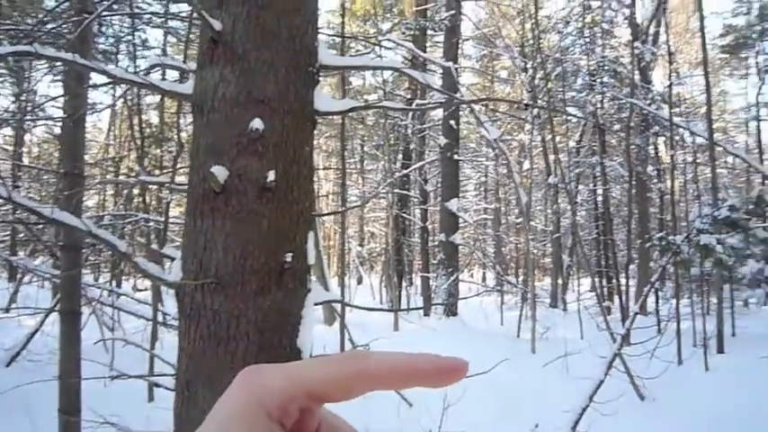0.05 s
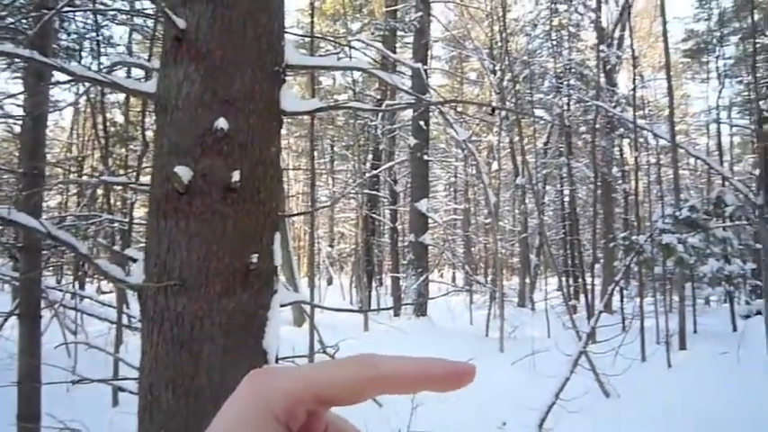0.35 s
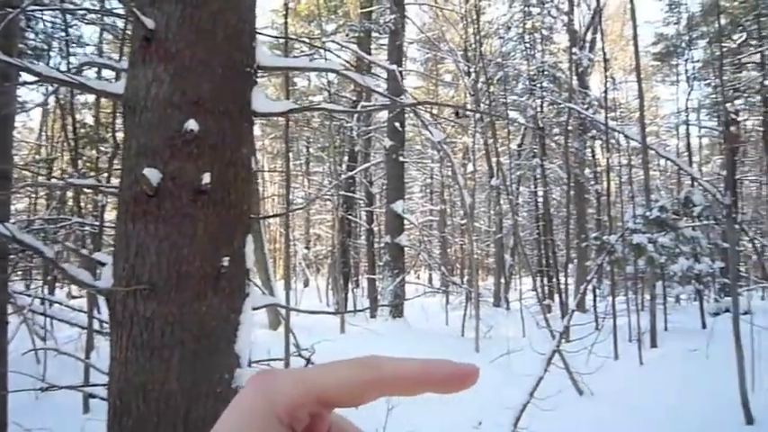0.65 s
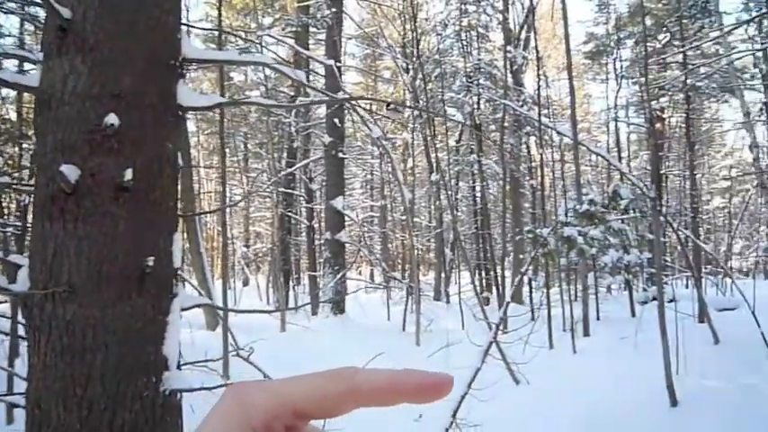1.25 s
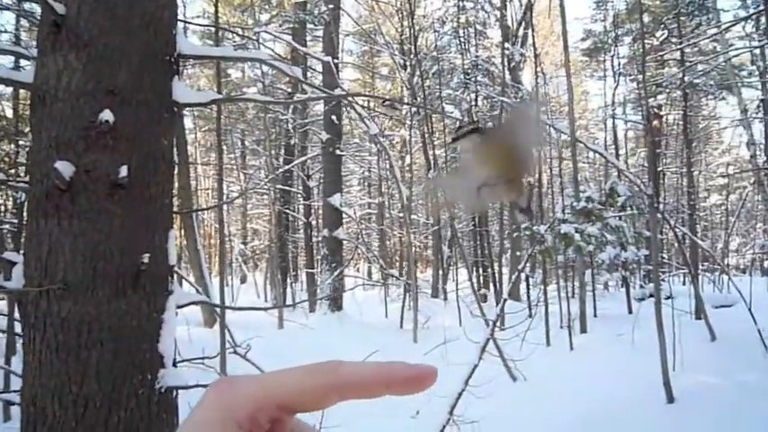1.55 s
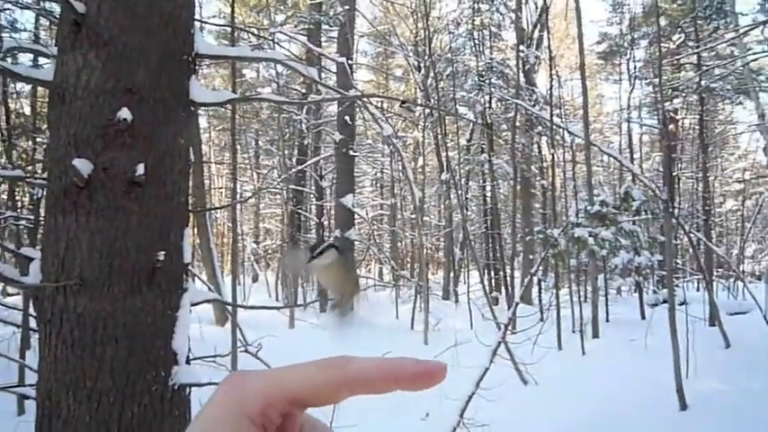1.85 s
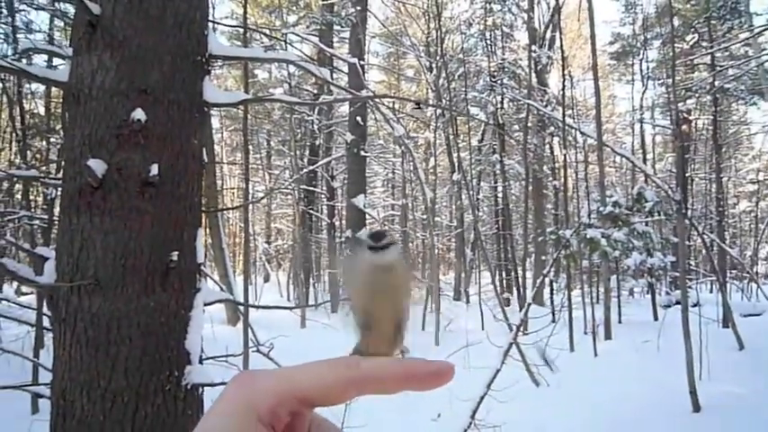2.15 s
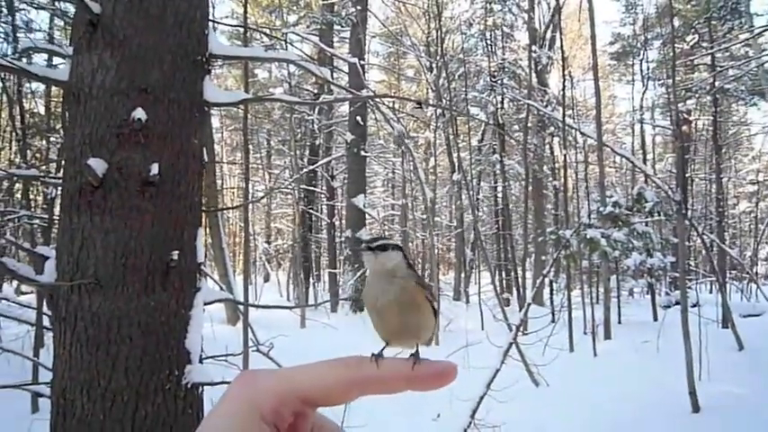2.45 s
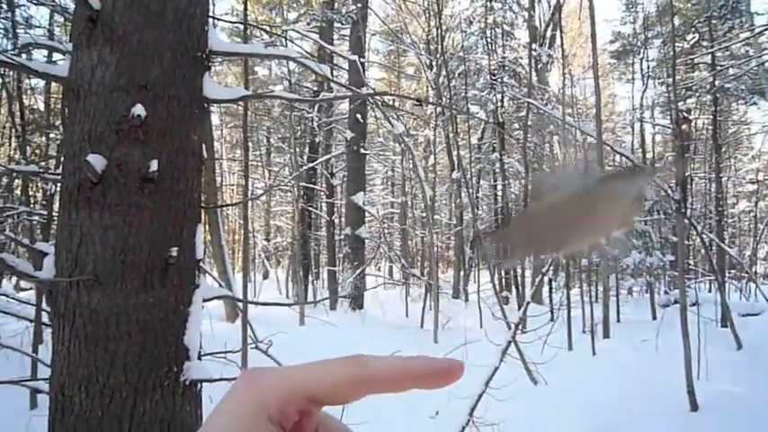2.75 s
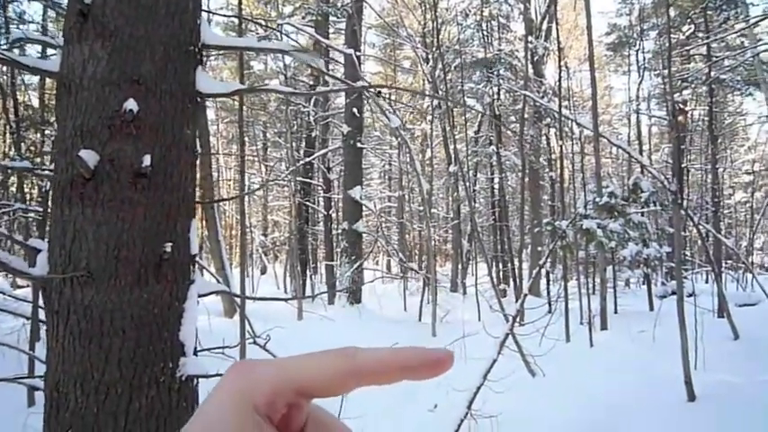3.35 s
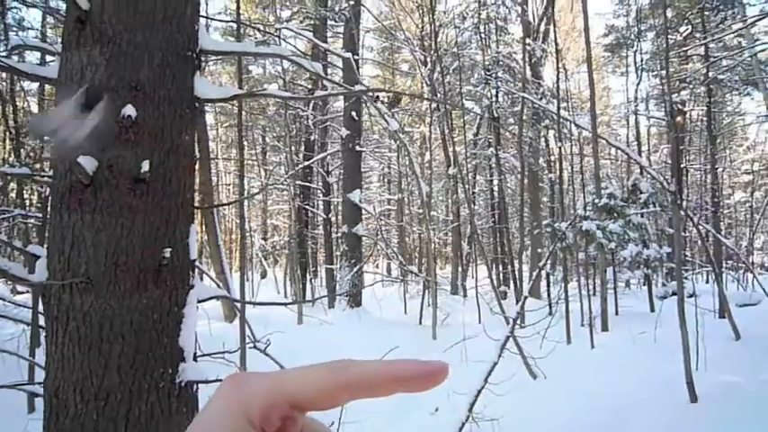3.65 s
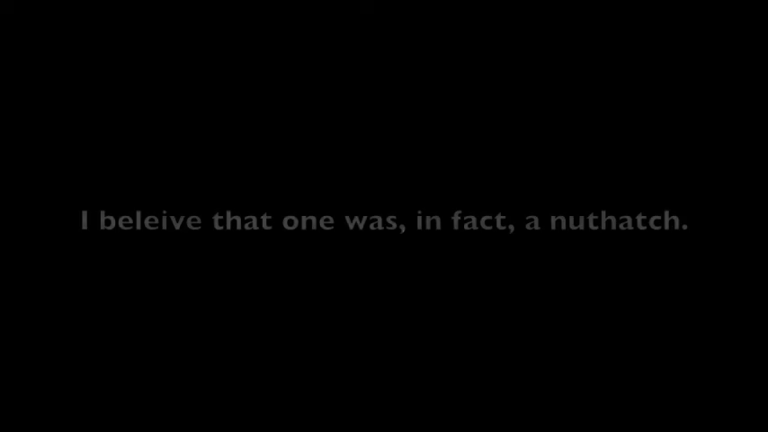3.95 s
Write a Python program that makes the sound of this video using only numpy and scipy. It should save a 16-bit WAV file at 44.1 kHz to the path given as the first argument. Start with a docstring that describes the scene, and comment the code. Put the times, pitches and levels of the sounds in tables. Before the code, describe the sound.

A small bird's wings flutter softly up close, with tiny chirps over faint forest wind.

```python
"""A quiet snowy forest, heard from a hand-held camera: wind hisses in the trees, thin whistles sound far off.
Close to the microphone a small bird flutters in and perches on an outstretched hand, each wingbeat
a soft pulse of air with a swish of feathers. It takes off with a clap of its wings and a few tiny
nasal chirps. The camera whines faintly and is softly bumped and scuffed near the start and the end."""
import sys
import numpy as np
from scipy import signal
from scipy.fft import rfft, irfft
from scipy.io import wavfile

SR = 44100
rng = np.random.default_rng(int(sys.argv[2]) if len(sys.argv) > 2 else 0)


def pcm_store(signal):
    """Save signal as 16-bit PCM."""
    levels = np.round(np.clip(np.atleast_2d(signal), -1, 1) * 32767)
    wavfile.write(sys.argv[1], SR, levels.astype(np.int16).T)


N = 176400

# Feathers brushing the air. Each row: frequency in Hz, relative level in dB.
FEATHER_SPECTRUM = [(100, -2.5), (300, 7), (700, 7.5), (1050, 2), (1400, 3), (2200, -1.5), (3500, -7),
                    (5500, -11), (7500, -34)]


def undb(db):
    """Decibels to gain."""
    return 10 ** (np.asarray(db) / 20)


def noise(spectrum):
    """Noise of rms 1, shaped by rows of frequency in Hz and relative level in dB."""
    hz, db = np.array(spectrum).T
    f = np.maximum(np.arange(N // 2 + 1) * SR / N, 1)
    gain = undb(np.interp(np.log(f), np.log(hz), db))
    y = irfft(rfft(rng.standard_normal(N)) * gain, N)
    return y / y.std()


def band(hz, width_hz):
    """Noise of rms 1 in one bell-shaped band."""
    f = np.arange(N // 2 + 1) * SR / N
    y = irfft(rfft(rng.standard_normal(N)) * np.exp(-2 * ((f - hz) / width_hz) ** 2), N)
    return y / y.std()


def wander(rate_hz):
    """A smooth random wander of rms 1."""
    return band(0, 2 * rate_hz)


def gate(age, length, attack_s, release_s):
    """An envelope that rises, holds and falls in straight lines."""
    return np.clip(np.minimum(age / attack_s, (length - age) / release_s), 0, 1)


def bell(age, spread_s):
    """A bell-shaped envelope that peaks at age zero."""
    return np.exp(-.5 * (age / spread_s) ** 2)


def swells(t, rows):
    """Bell-shaped swells, one for each row of centre, spread and level."""
    return sum(undb(db) * bell(t - at, spread) for at, spread, db in rows)


def wind(t):
    """Wind in the trees all around: a soft rush that swells and flickers under an even hiss."""
    # The rush and the high hiss. Each row: frequency in Hz, relative level in dB.
    rush_spectrum = [(20, -16.5), (45, -18.5), (80, -2.5), (130, 0), (175, 3), (260, 2), (345, -2),
                     (440, -1.5), (690, -5.5), (790, -2), (910, -6), (990, -0.5), (1120, -5.5), (1280, -9),
                     (1700, -14.5), (3000, -21.5), (7000, -45)]
    hiss_spectrum = [(500, -1), (2000, -0.5), (3000, -3.5), (3450, -3), (4300, -3), (5200, -4.5),
                     (6500, -5.5), (7100, -10), (7600, -20), (8100, -34.5)]
    # The strength of the rush. Each row: time in seconds, level in dB.
    rush_levels = [(0, -55), (.07, -55.5), (.2, -55), (.35, -54.5), (.8, -53), (.92, -54.5), (1.02, -52.5),
                   (1.13, -55.5), (1.47, -52.5), (1.9, -55), (2.2, -54), (2.35, -55), (2.85, -54.5),
                   (3.3, -54.5), (3.45, -55), (3.57, -54), (3.7, -56.5), (3.9, -53.5)]
    flicker_db = 1.13 * wander(rate_hz=34)
    rush_db = np.interp(t, *np.array(rush_levels).T) + flicker_db
    return undb(rush_db) * noise(rush_spectrum) + undb(-63.5) * noise(hiss_spectrum)


def far_whistles(t):
    """Faint high notes far off, even in level, blurred by a quick waver in pitch."""
    # Each row: start in seconds, length in seconds, pitch in Hz, level in dB.
    notes = [(0.81, .06, 4200, -67), (1.307, 0.21, 2720, -70.5), (1.36, .17, 4100, -69.5),
             (1.506, .3, 4120, -72.5), (2.53, 0.057, 3600, -71)]
    out = np.zeros(N)
    for start, length, hz, db in notes:
        waver_hz = 190 * wander(rate_hz=260)
        phase = 2 * np.pi * np.cumsum(hz + waver_hz) / SR
        envelope = gate(t - start, length, attack_s=.03, release_s=.03)
        out += undb(db) * envelope * np.sqrt(2) * np.sin(phase)
    return out


def camera_whine(t):
    """The camera's electronics put thin steady tones on the microphone."""
    # Each row: frequency in Hz, rms level in dB.
    tones = [(6666.6, -93.5), (7273.6, -93)]
    return sum(undb(db) * np.sqrt(2) * np.sin(2 * np.pi * hz * t) for hz, db in tones)


def grip_scuffs(t):
    """The hand rubs softly on the camera, right by the microphone."""
    # Each row: centre in seconds, spread in seconds, level in dB.
    scuffs = [(0.058, 0.014, -52.5), (0.097, 0.0091, -53), (3.45, 0.048, -56.5), (3.674, 0.039, -54.5),
              (3.772, 0.022, -55)]
    # The colour of the rubbing. Each row: frequency in Hz, relative level in dB.
    scuff_spectrum = [(100, -14.5), (300, -17), (460, 14.5), (620, 3.5), (800, 6.5), (1120, 10),
                      (1500, -23), (4000, -35.5), (8000, -56)]
    return swells(t, scuffs) * noise(scuff_spectrum)


def camera_bumps(t):
    """Light knocks briefly ring the camera body that holds the microphone."""
    # Each row: start in seconds, level in dB.
    knocks = [(0.03, -44), (0.0442, -42), (0.0792, -38), (0.0811, -42.5), (0.0841, -41), (3.651, -49.5),
              (3.687, -43.5), (3.833, -55)]
    # Each row: frequency in Hz, level relative to the knock in dB, seconds to die away by 60 dB.
    body_modes = [(242, -22, 0.028), (426, -7, 0.043), (756, -10, 0.014), (1020, -3.5, 0.02),
                  (2120, -16, .006), (3900, -15.5, 0.0078)]
    out = np.zeros(N)
    for at, db in knocks:
        on = (t >= at) & (t < at + .1)
        age = t[on] - at
        for hz, mode_db, t60 in body_modes:
            out[on] += undb(db + mode_db - 60 * age / t60) * np.sin(2 * np.pi * hz * age)
    return out


def wing_draught(t):
    """At close range the draught of the wings buffets the microphone."""
    # Each row: centre in seconds, spread in seconds, level in dB.
    puffs = [(2.095, 0.14, -65), (2.842, 0.06, -51), (2.984, 0.045, -66)]
    # The low rumble of a puff. Each row: frequency in Hz, relative level in dB.
    puff_spectrum = [(25, -10.5), (50, -2.5), (75, 3), (110, 0), (170, 6), (240, -8.5), (500, -35.5),
                     (2000, -45.5)]
    return swells(t, puffs) * noise(puff_spectrum)


def wingbeats(t):
    """Each stroke pushes one soft pulse of air, sheds low eddies and swishes through the feathers."""
    # Each row: centre in seconds, level in dB, pitch of the air pulse in Hz, swish trim in dB.
    strokes = [(.497, -43.5, 240, -10), (0.545, -51, 240, 0), (0.593, -64, 239, 1), (0.656, -45, 239, -13),
               (0.692, -44, 240, -8), (0.734, -46, 241, -28), (0.774, -48, 240, -1),
               (0.81, -46.5, 240, -6.5), (0.974, -52, 220, -10), (1.033, -47, 220, -1.5),
               (1.226, -38, 230, -11.5), (1.272, -55.5, 242, 5.5), (1.314, -39, 240, -9),
               (1.358, -40.5, 260, -8), (1.408, -61, 240, 9), (1.444, -52, 240, 0),
               (1.481, -40.5, 259, -5.5), (1.532, -51, 240, 1.5), (1.602, -43, 240, -9),
               (1.645, -53, 260, -4), (1.69, -47, 220, -5), (1.728, -40.5, 260, -12),
               (1.769, -43.5, 220, -10), (1.816, -39.5, 240, -12), (1.858, -42, 220, -26),
               (1.889, -45, 200, -7), (1.934, -44, 160, -6), (1.974, -38, 220, -15),
               (2.059, -43.5, 159, -10), (2.126, -47, 160, -3.5), (2.151, -45.5, 160, -8),
               (2.185, -43.5, 163, -19), (2.769, -46, 130, -9), (2.789, -43.5, 220, -13),
               (2.835, -50.5, 180, 1), (2.863, -50.5, 260, -4), (2.879, -48, 260, 1.5),
               (2.909, -47, 172, -19), (2.948, -38.5, 171, -18), (2.993, -42, 190, -13.5),
               (3.025, -45.5, 200, -11), (3.081, -52, 220, -17), (3.134, -59, 220, -15)]
    feathers, eddies = noise(FEATHER_SPECTRUM), band(hz=130, width_hz=180)
    out = np.zeros(N)
    for at, db, hz, swish_trim_db in strokes:
        on = np.abs(t - at) < .06
        age = t[on] - at
        u = (np.pi * hz * age) ** 2
        pulse = (2 * u - 1) * np.exp(-u)  # a dip in pressure between two smaller crests
        wake = undb(-22) * bell(age, spread_s=.012) * eddies[on]
        swish = undb(-8.5 + swish_trim_db) * bell(age, spread_s=.01) * feathers[on]
        out[on] += undb(db) * (pulse + wake + swish)
    return out


def feather_flicks(t):
    """Stiff flight feathers slip past each other: a dry, heavily damped tick with a little grain."""
    # Each row: start in seconds, level in dB, pitch in Hz, decay time in seconds.
    ticks = [(1.029, -46, 1100, .003), (1.415, -45, 750, 0.0038), (1.444, -43.5, 1080, 0.0046),
             (1.486, -46, 1050, 0.0049), (1.533, -44.5, 1060, .005), (1.648, -50, 1000, 0.0037),
             (1.754, -45.5, 1020, 0.0058), (1.809, -41.5, 1050, 0.0042), (1.823, -48, 1050, 0.0052),
             (2.064, -45, 1000, .003), (2.18, -46, 1050, 0.0048), (2.7645, -48, 1200, .0015),
             (2.779, -47, 1000, 0.0025), (2.7885, -44.5, 800, 0.0034), (2.8298, -39, 950, 0.0016),
             (2.836, -46, 1100, 0.0018), (2.8635, -44.5, 950, .003), (2.8748, -45, 1450, 0.0008),
             (2.9085, -42, 750, 0.0022), (2.9903, -43.5, 800, 0.0016), (3.05, -43, 700, 0.0023)]
    attack_s = .00033
    grain = undb(-13) * noise(FEATHER_SPECTRUM)
    out = np.zeros(N)
    for at, db, hz, decay in ticks:
        on = (t >= at) & (t < at + .04)
        age = t[on] - at
        envelope = np.minimum(age / attack_s, 1) * np.exp(-age / decay)
        out[on] += undb(db) * envelope * (np.sin(2 * np.pi * hz * age) + grain[on])
    return out


def wing_clap(t):
    """The wings snap once at take-off: a sharp swing of pressure, then a short rustle of feathers."""
    clap_at_s, snap_hz, rustle_rise_s = 2.8287, 450, .0033
    u = 2 * np.pi * snap_hz * (t - clap_at_s)
    snap = undb(-33) * u * np.exp((1 - u ** 2) / 2)
    rise = np.maximum(t - clap_at_s, 0) / rustle_rise_s
    rustle = undb(-50.5) * rise * np.exp(1 - rise) * noise(FEATHER_SPECTRUM)
    return snap + rustle


def chirps(t):
    """Very short gliding notes with a little rasp; the throat favours the second to fourth harmonics."""
    # Each row: start and length in seconds, first and last pitch in Hz, level in dB,
    # tilt above the third harmonic in dB per octave.
    notes = [(2.8775, .0125, 1090, 1108, -56, 7.5), (2.883, 0.016, 1120, 1140, -59, -11.5),
             (2.908, 0.0092, 1230, 1098, -47.5, -8), (3.012, 0.013, 1085, 976, -54, -6)]
    # The resonances of the bird's throat. Each row: frequency in Hz, gain in dB.
    throat = [(1000, -20), (2000, 2), (2350, -2.5), (3000, 4), (3500, -2), (4400, -4), (4750, -3),
              (5500, -15.5), (6800, -26)]
    throat_hz, throat_db = np.array(throat).T
    jitter = 1 + .012 * wander(rate_hz=300)
    rasp = undb(-12.5) * band(hz=3500, width_hz=4400)
    out = np.zeros(N)
    for start, length, from_hz, to_hz, db, tilt in notes:
        on = (t >= start) & (t < start + length)
        age = t[on] - start
        hz = (from_hz + (to_hz - from_hz) * age / length) * jitter[on]
        phase = 2 * np.pi * np.cumsum(hz) / SR
        tone = 0
        for k in range(1, 7):
            harmonic_db = np.interp(k * hz, throat_hz, throat_db) + tilt * np.log2(max(k / 3, 1))
            tone += undb(harmonic_db) * np.sin(k * phase + 2 * np.pi * rng.random())
        envelope = gate(age, length, attack_s=.0018, release_s=.0023)
        out[on] += undb(db) * envelope * (tone + rasp[on])
    return out


def scene():
    """One microphone hears the forest beyond, the camera in the hand and the bird close by."""
    t = np.arange(N) / SR
    forest = wind(t) + far_whistles(t)
    camera = camera_whine(t) + grip_scuffs(t) + camera_bumps(t)
    bird = wing_draught(t) + wingbeats(t) + feather_flicks(t) + wing_clap(t) + chirps(t)
    return (forest + camera + bird)[None]


def record(dry):
    """The small camera cuts the high treble and adds a constant offset; the sound fades out at the end."""
    top_hz, offset = 7800, -.0128
    silent_at_s, fade_length_s = 3.918, .1
    lowpass = signal.ellip(8, .2, 70, top_hz, fs=SR, output="sos")
    fade = np.clip((silent_at_s - np.arange(N) / SR) / fade_length_s, 0, 1)
    return (signal.sosfilt(lowpass, dry) + offset) * fade


dry = scene()
out = record(dry)
pcm_store(out)
```